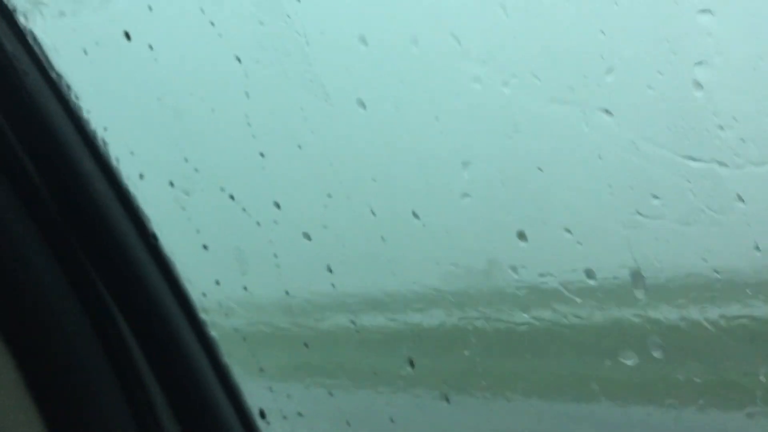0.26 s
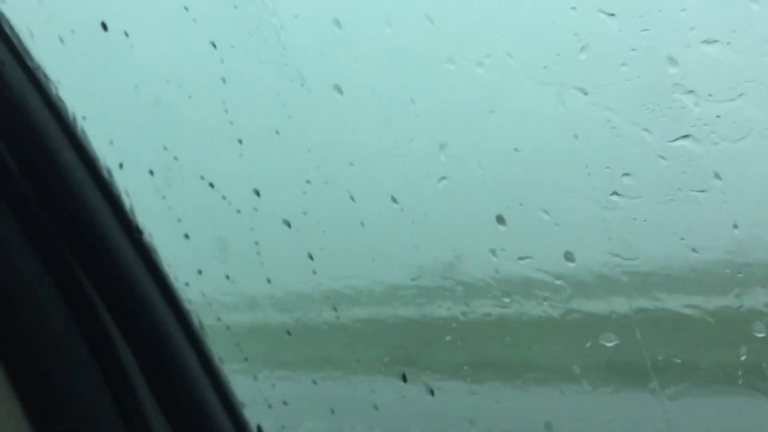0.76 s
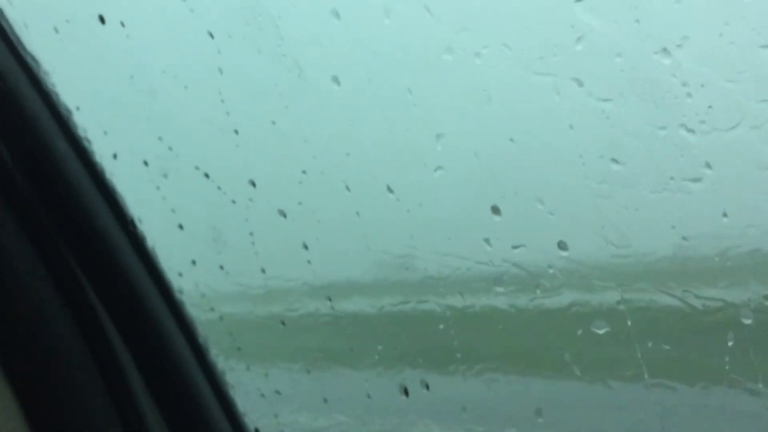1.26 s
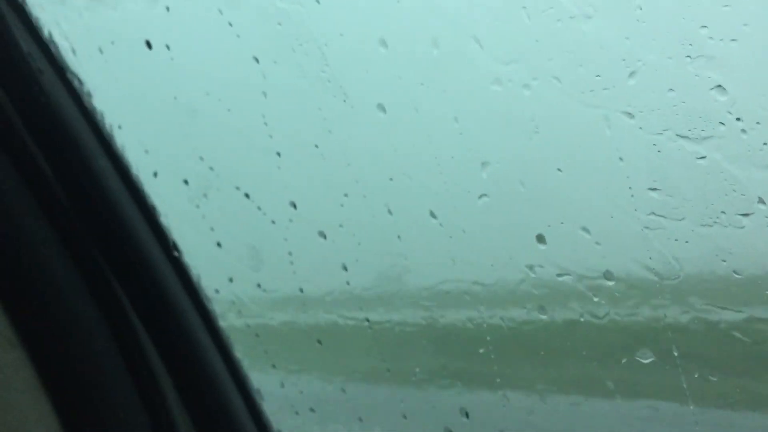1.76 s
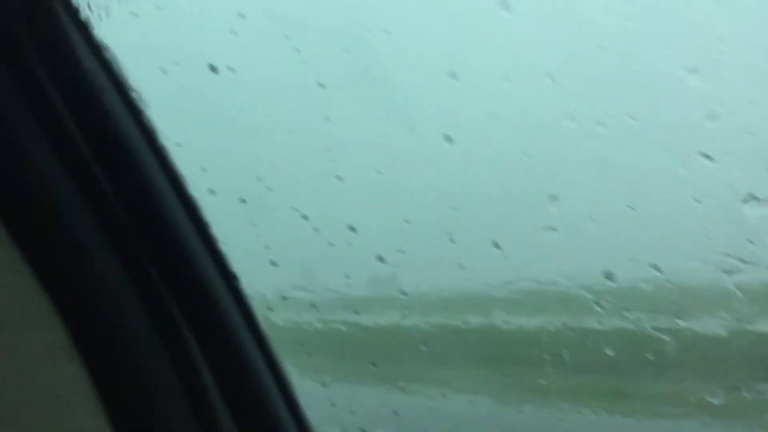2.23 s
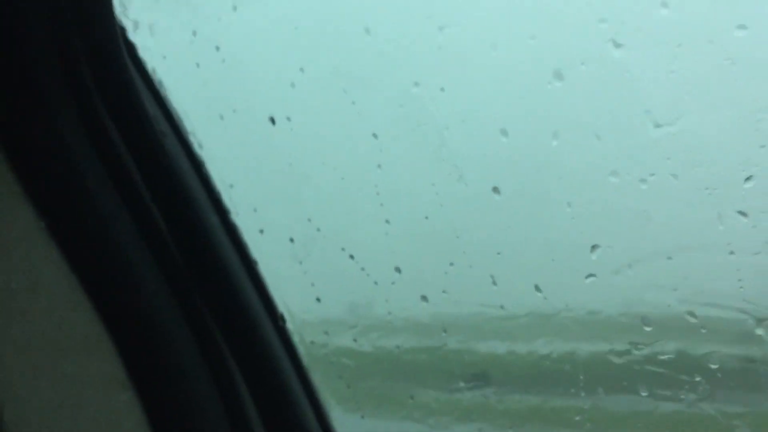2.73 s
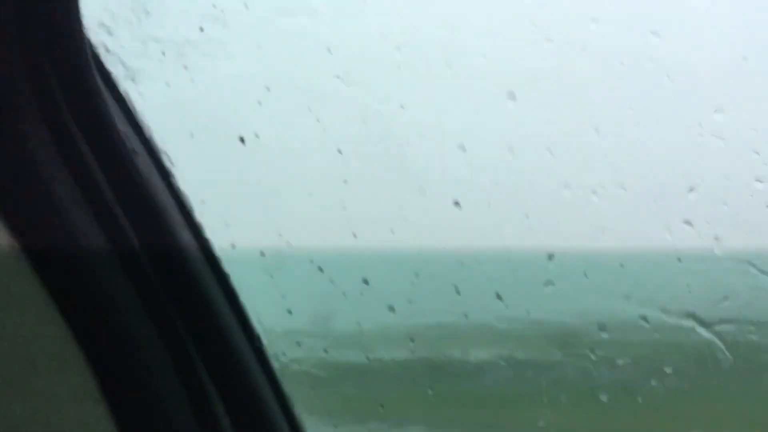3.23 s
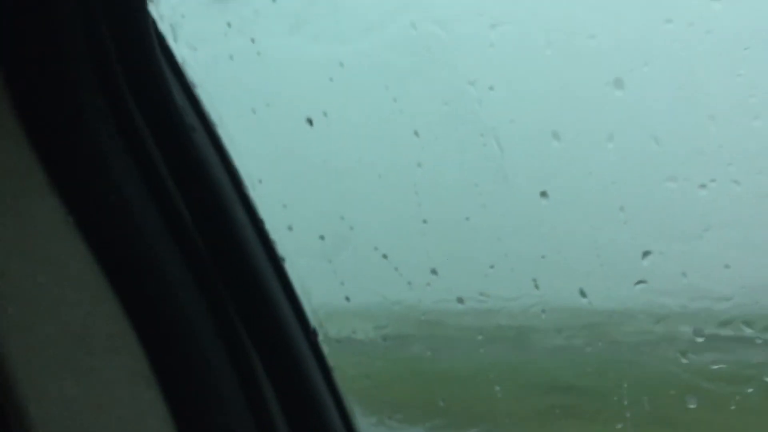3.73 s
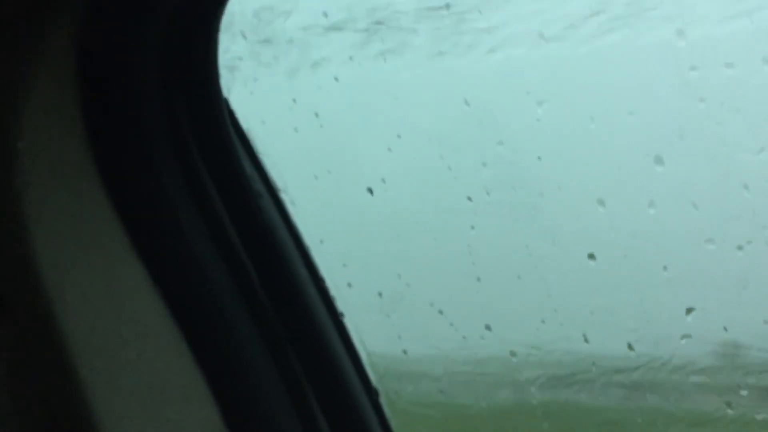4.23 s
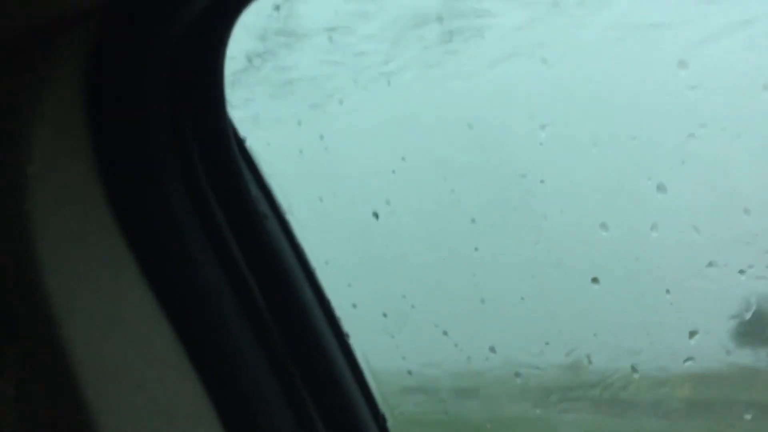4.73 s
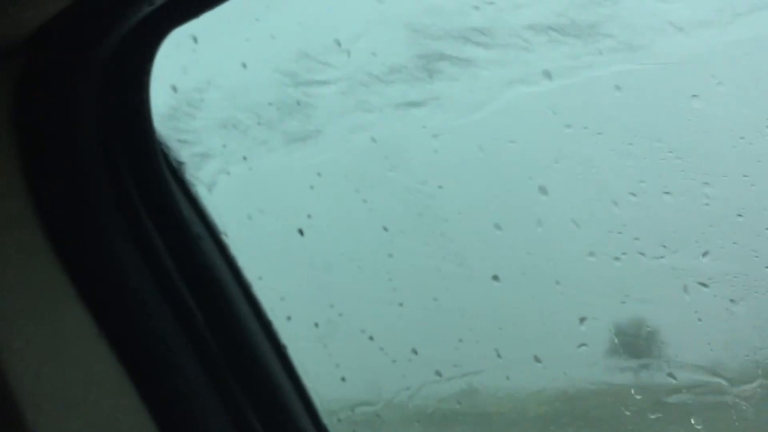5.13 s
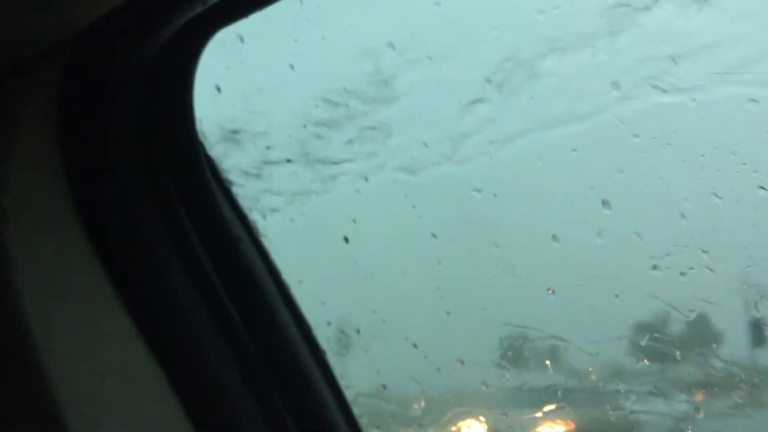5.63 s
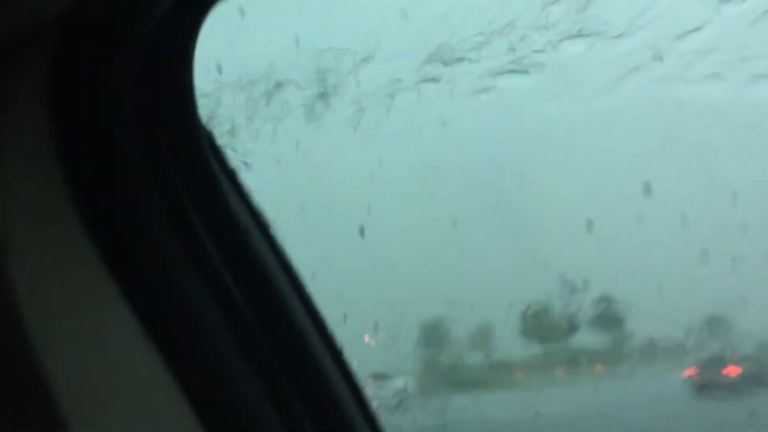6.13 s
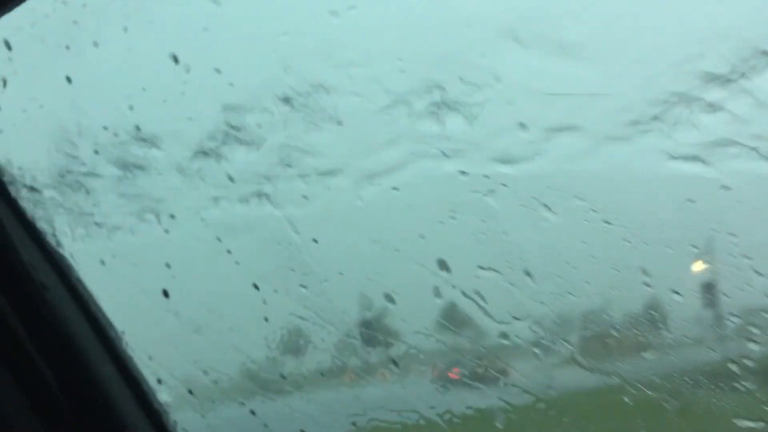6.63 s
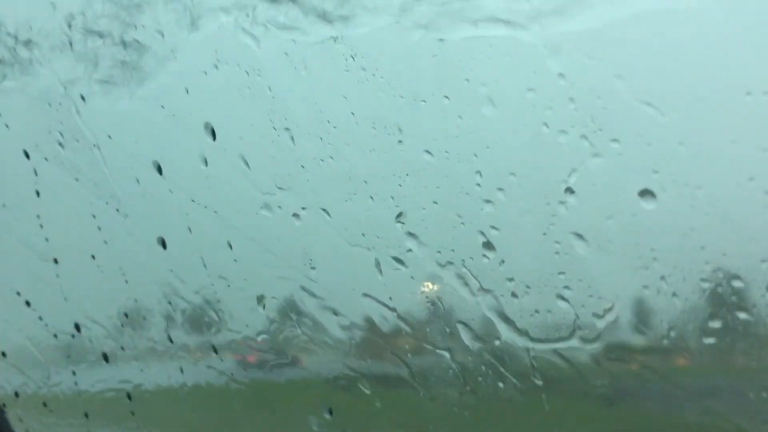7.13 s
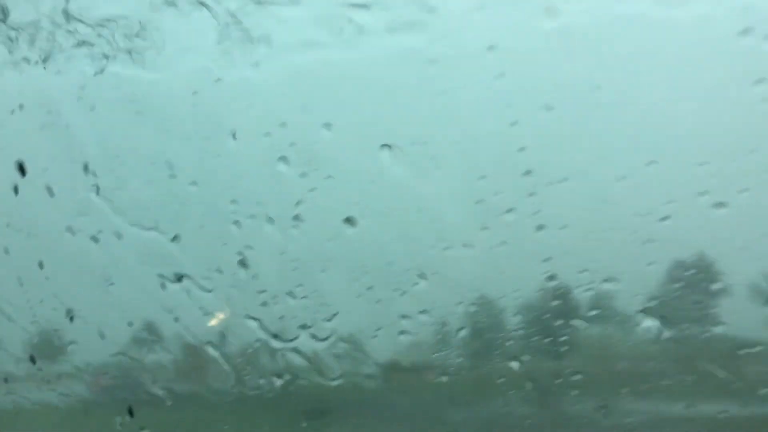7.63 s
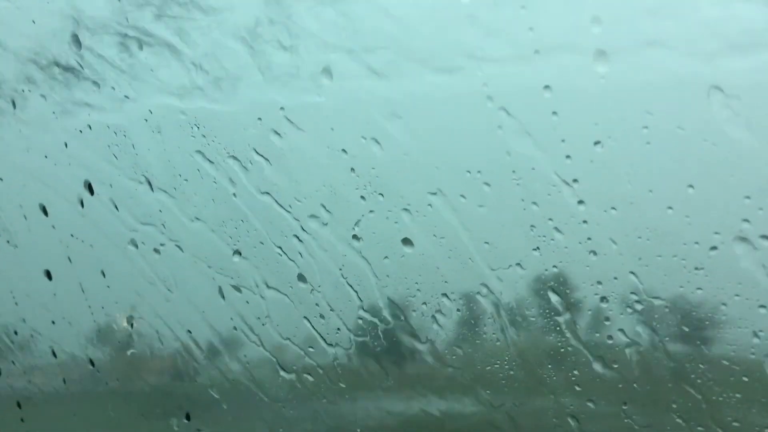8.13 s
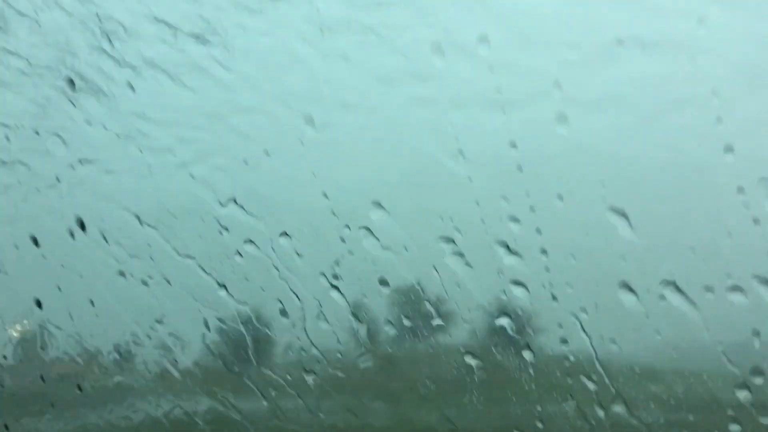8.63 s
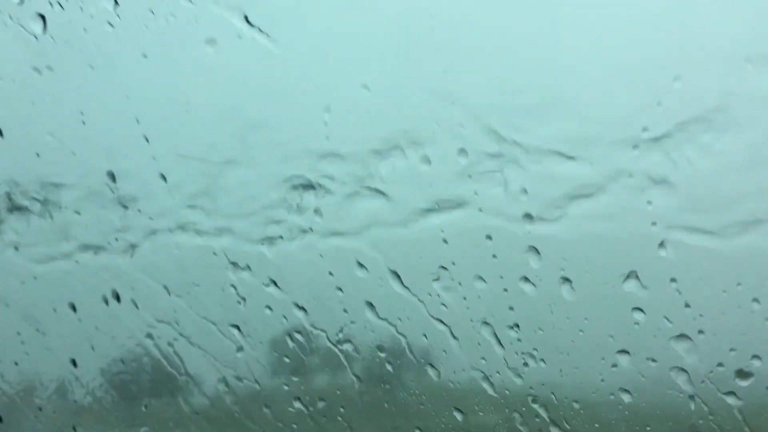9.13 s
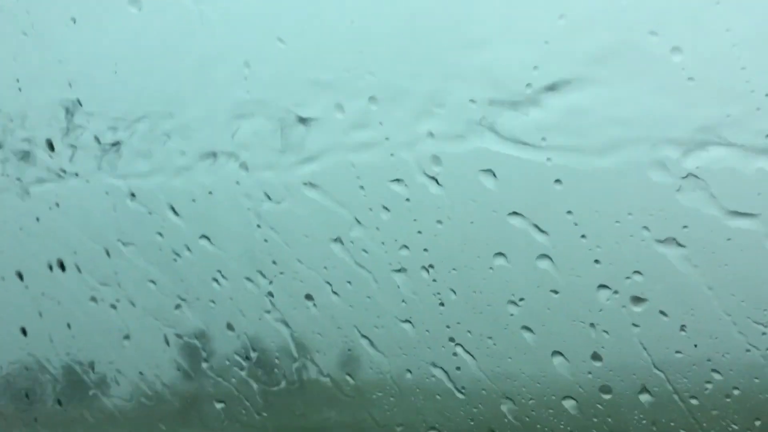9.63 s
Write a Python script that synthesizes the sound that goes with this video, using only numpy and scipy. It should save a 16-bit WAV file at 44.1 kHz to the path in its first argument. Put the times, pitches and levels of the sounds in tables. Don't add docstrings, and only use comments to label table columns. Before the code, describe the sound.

Heavy rain heard inside a small padded car cabin, microphone an arm's length from the glass. From 0 s a dense, uneven patter on the window mixes with hollow roof drumming, a thin spray hiss and a low rumble as wind shakes the shell. Near 2.4 s a sharp, loud drop smacks the pane with a metal knock, and more follow. Around 3 s a gusty sheet arrives with dull low thuds; the rain briefly slackens about 3.5 s. From 4 to 6 s it is hard again, with more thuds at 4 s and the brightest splats clustered around 5.5 to 5.9 s. A deep blow booms at 6.3 s. Flung water knocks sheet metal at about 7.1, 8.0 and most strongly 8.75 s, with muffled thumps beneath. Towards 9.8 s the downpour eases a little, still pattering with scattered drops and bumps.

```python
import sys
import numpy as np
from scipy import signal
from scipy.fft import rfft, irfft, next_fast_len
from scipy.io import wavfile
from scipy.ndimage import uniform_filter1d, map_coordinates

SR = 44100
rng = np.random.default_rng(int(sys.argv[2]) if len(sys.argv) > 2 else 0)


def boost_factor(decibels):
    exponent = np.asarray(decibels, float) / 20
    return 10 ** exponent


def master(y):
    cut = np.clip(np.atleast_2d(y).T, -1, 1)
    pcm = np.round(cut * 32767)
    wavfile.write(sys.argv[1], SR, pcm.astype(np.int16))


N = 435266


def unit(x):
    return x / np.sqrt(np.mean(x ** 2) + 1e-20)


def peak(x):
    return x / np.abs(x).max()


def along(points, hz):
    f, v = np.transpose(points)
    return np.interp(np.log(hz + 1), np.log(f + 1), v)


def wobble(rate):
    return map_coordinates(rng.standard_normal(4000), [np.arange(N) * rate / SR])


def swells(rows):
    t = np.arange(0, N + 64, 64) / SR
    db = sum(size * np.exp(-0.5 * ((t - s) / width) ** 2) for s, size, width in rows)
    return np.interp(np.arange(N) / SR, t, db)


def filtered(x, response):
    m = next_fast_len(len(x) + min(len(x), SR // 2))
    return irfft(rfft(x, m) * response(np.fft.rfftfreq(m, 1 / SR)), m)[:len(x)]


def coloured(x, colour):
    return unit(filtered(x, lambda hz: boost_factor(along(colour, hz))))


def modes(table):
    def response(f):
        total = 0
        for k, (centre, width, db) in enumerate(table):
            resonance = 1j * f * width / (centre * centre - f * f + 1j * f * width)
            total = total + (-1) ** k * boost_factor(db) * resonance
        return total
    return response


def place(out, s, sound):
    out[round(s * SR):][:len(sound)] += sound


def cabin(x, wet_db):
    # frequency in Hz, time to fall 60 dB in seconds.
    decay = [(300, 0.097), (2000, 0.073), (10000, 0.044)]
    out, step = np.zeros(N + SR), SR // 8
    edge = np.sin(np.pi / 2 * np.arange(512) / 512)
    fade = np.concatenate([edge, np.ones(step - 512), edge[::-1]])
    for start in range(0, N, step):
        hz, t, z = signal.stft(rng.standard_normal(SR // 8), SR, nperseg=128)
        fall = boost_factor(-60 * t / along(decay, hz)[:, None])
        tail = signal.istft(z * fall, SR, nperseg=128)[1]
        stretch = x[start:][:len(fade)] * fade[:N - start]
        wet = signal.fftconvolve(stretch, tail / np.linalg.norm(tail))
        out[start:start + len(wet)] += wet
    return x + boost_factor(wet_db) * out[:N]


def drops(count, spread_db, clump_db):
    when, size, sign = rng.random((count, 3)).T
    size_db = np.minimum(-spread_db * np.log(1 - size), 14)
    hits = np.bincount((when * N).astype(int), np.sign(sign - 0.5) * boost_factor(size_db), N)
    return unit(hits * boost_factor(clump_db * wobble(35)))


def burst(length, resonances, crack_db, tones_hz, rough):
    # frequency in Hz, level in dB per Hz.
    snap = [(600, -40), (1500, -9), (3500, -8), (5500, 1.5), (7500, -10.5), (10500, -23), (15200, -35),
            (15600, -90)]
    t = np.arange(SR // 10) / SR
    shape = (1 - np.exp(-t / 0.0017)) * np.exp(-t / length)
    ring, crack = rng.standard_normal((2, len(t))) * shape
    ring = filtered(ring, lambda f: modes(resonances)(f) / (1 + (f / 4500) ** 8))
    clear = shape * sum(np.sin(2 * np.pi * hz * t) for hz in tones_hz)
    crack = filtered(crack * np.exp(-t / 0.012), lambda f: boost_factor(along(snap, f)))
    splash = rough * peak(ring) + (1 - rough) * peak(clear)
    return peak(splash) + boost_factor(crack_db) * peak(crack)


def rain():
    # time in seconds, glass patter in dB.
    pour = [
        (0.0, -33.5),
        (1.64, -32),
        (3.29, -37),
        (4.93, -32.5),
        (6.58, -33),
        (8.22, -34.5),
        (9.87, -38),
    ]
    # time in seconds, change in dB, width in
    # seconds.
    sheets = [(0.12, 3, 0.027), (0.78, 2.5, 0.058), (1.44, 1.5, 0.08), (2.06, 3, 0.046), (2.58, 3, 0.021),
              (3.0, 5.5, 0.15), (3.16, 1, 0.072), (3.78, 7, 0.044), (3.98, 4, 0.023), (4.38, 4, 0.034),
              (5.04, 7.5, 0.021), (5.18, 2, 0.022), (5.56, 4, 0.07), (5.98, 3, 0.075), (6.24, 5, 0.025),
              (6.42, 3.5, 0.03), (6.68, 5.5, 0.016), (7.54, 2.5, 0.023), (7.81, 2.5, 0.052),
              (8.44, 6, 0.012), (8.72, 3.5, 0.033), (9.04, 6, 0.099), (9.18, 3.5, 0.036), (9.51, 3.5, 0.05),
              (9.68, 0, 0.022), (9.76, 6, 0.063),
              (.36, 1, 0.027), (.53, 1.5, .02), (2.27, -0.5, .025), (3.39, 2, 0.033), (4.52, 3.5, 0.015),
             (4.68, 3.5, 0.028), (4.82, 4.5, 0.012), (5.32, 0.5, .02), (6.84, 1, 0.024), (7.28, 0, 0.03),
             (7.97, 2, 0.022), (8.26, 3, 0.02), (8.87, 2.5, 0.0096), (9.33, 2.5, 0.016), (2.0, 0.5, 0.092),
             (4.95, -1, 0.11), (6.1, 0, 0.065), (.6, 0.5, .2)]
    # time in seconds, fall in dB, width in seconds.
    lulls = [(2.16, -7, 0.044), (3.54, -4.5, 0.01), (4.12, -0.5, 0.039), (4.28, -3, 0.019),
             (4.42, -5, 0.11), (4.57, -2.5, 0.037), (4.96, -7.5, 0.014), (5.26, -5.5, 0.013),
             (5.8, -2.5, 0.02), (6.545, -9, 0.034), (6.96, -6, 0.08), (7.14, -4, 0.038), (7.9, -4, 0.029),
             (8.12, -3, 0.071), (8.36, -1, 0.034), (8.6, -2.5, 0.032)]
    # time in seconds, change in dB, width in seconds.
    slaps = [(2.14, 4, 0.03), (3.42, -1, 0.19), (4.74, 2, 0.03), (5.7, 5, 0.026), (6.4, 0, 0.066),
             (4.2, -1.5, .08), (7.84, 2.5, 0.065), (9.36, -0.5, 0.11), (9.48, -0.5, 0.022),
             (9.58, -1.5, .06), (.6, 1, 0.092), (1.9, 1, 0.094), (8.06, -1.5, 0.021), (8.78, 3, 0.027)]
    # time in seconds, change of spray in dB, width in seconds.
    mist = [(.7, 1.5, 0.66), (2.5, -3.5, .05), (3.94, 1.5, 0.027), (4.38, 2.5, 0.031), (4.62, -1.5, 0.045),
            (5.84, 2, 0.053), (6.6, -1.5, 0.28), (7.075, 10.5, .005), (5.9, 0.5, 0.045), (2.95, 2, .05),
            (5.53, 3.5, .015), (5.64, 7, .012), (8.75, 4.5, 0.0087), (7.645, 6, .012), (8.22, 1, 0.054),
            (8.52, -1.5, 0.17), (9.67, -3, 0.13)]
    # frequency in Hz, level in dB per Hz.
    glass_colour = [(1000, -25), (1700, -3.5), (2610, -5), (3210, 1), (4520, -11.5), (5880, -42.5),
                    (9940, -120)]
    # frequency in Hz, level in dB per Hz.
    roof_colour = [(190, -31), (330, 1), (474, -3.5), (551, 2), (762, -8), (1050, -3.5), (1280, -7),
                   (1570, -6.5), (1830, -29), (2000, -13), (2600, -16), (4400, -120)]
    # frequency in Hz, level in dB per Hz.
    spray_colour = [(3500, -47), (4900, 1), (5600, 1), (7000, -7), (8000, -15), (9500, -19.5),
                    (10500, -28.5), (12000, -29), (15200, -42.5)]

    times, patter_db = np.transpose(pour)
    pour_db = np.interp(np.arange(N) / SR, times, patter_db) + swells(sheets + lulls)
    pour_db = pour_db - 0.18 * wobble(14)
    swing_db = pour_db - pour_db.mean()
    near = unit(cabin(drops(count=35000, spread_db=3, clump_db=0.7), wet_db=-3))

    def layer(colour, far_db):
        return coloured(near + boost_factor(far_db) * rng.standard_normal(N), colour)

    roof_db = -0.5 + 0.64 * swing_db + swells(slaps) + 0.76 * wobble(14)
    spray_db = -21 + 0.91 * swing_db + swells(mist) + 0.55 * wobble(27)
    glass = boost_factor(-0.5 + swing_db) * layer(glass_colour, far_db=0.0)
    roof = boost_factor(roof_db) * layer(roof_colour, far_db=1.5)
    spray = boost_factor(spray_db) * layer(spray_colour, far_db=0.5)
    return boost_factor(pour_db.mean()) * (glass + roof + spray)


def smacks():
    # start in seconds, peak in dB, centre in Hz, sharp crack in dB relative.
    big_drops = [(1.76, -31, 3150, -14), (4.832, -21.5, 3100, -19), (2.361, -10, 3910, -26),
                 (2.562, -13.5, 2220, -34), (2.626, -19.5, 1490, -28.5), (3.058, -28.5, 3220, -25),
                 (3.65, -21.5, 1584, -28), (3.721, -21, 3310, -22.5), (3.966, -25, 3460, -15.5),
                 (4.019, -23, 2900, -19), (4.209, -15.5, 2700, -34), (4.365, -27.5, 3300, -16),
                 (4.645, -19, 1500, -30), (4.824, -21.5, 2390, -16), (4.998, -34, 3450, -30.5),
                 (5.013, -23, 3640, -27), (5.184, -14.5, 3230, -26), (5.302, -27, 3160, -30),
                 (5.525, -10, 3354, -17), (5.548, -14.5, 3050, -24), (5.634, -10.5, 3630, -15.5),
                 (5.704, -15.5, 3280, -24), (5.873, -15, 3080, -25), (5.957, -21, 2280, -17),
                 (6.667, -28, 2890, -25), (7.294, -21, 2750, -29), (7.55, -18.5, 3110, -26),
                 (7.628, -30, 1540, -18), (8.916, -20, 2054, -24.5), (9.399, -18.5, 3580, -32)]
    out = np.zeros(N + SR)
    for s, db, hz, crack_db in big_drops:
        pane = [(650, 400, -6), (1200, 600, -18.5), (hz, 750, 1.5), (2600, 4000, -5)]
        place(out, s, boost_factor(db - 1.5) * burst(0.0044, pane, crack_db + 3.5, [hz], rough=0.71))
    return out[:N]


def ticks():
    # start in seconds, peak in dB, centre in Hz.
    small_drops = [(0.0352, -30, 1765), (0.1886, -23, 3330), (1.261, -17, 2260), (1.4004, -23, 2900),
                   (2.219, -25, 3210), (3.3142, -21, 3180), (3.3885, -17.5, 2020), (3.4316, -22, 3260),
                   (3.468, -21.5, 3180), (3.5922, -20, 2980), (4.3215, -27, 1527), (4.5092, -22, 3136),
                   (4.5886, -17.5, 3160), (5.1315, -24.5, 3270), (5.1482, -26, 3170), (5.461, -18.5, 3110),
                   (5.5089, -15, 3365), (6.1802, -24, 2210), (6.581, -23.5, 2610), (6.6064, -29.5, 3280),
                   (6.986, -18, 1627), (7.1674, -23.5, 2706), (7.9389, -27.5, 2680), (8.113, -23.5, 3450),
                   (8.4125, -21.5, 1610), (8.468, -21.5, 3150), (8.5116, -18, 3170), (8.6932, -27.5, 3080),
                   (8.8723, -18, 3230), (9.6406, -27.5, 2340), (9.68, -19, 3110)]
    out = np.zeros(N + SR)
    for s, db, hz in small_drops:
        pane = [(hz, 500, 0), (3300, 3000, -9)]
        place(out, s, boost_factor(db - 6) * burst(0.0056, pane, -29, [hz], rough=0.71))
    return out[:N]


def knocks():
    # start in seconds, peak in dB, first ring in Hz, second ring in Hz, length in seconds.
    flung = [(2.362, -16.5, 910, 1500, 0.0037), (7.063, -17, 520, 656, 0.0017),
             (7.07, -14.5, 1120, 1610, 0.0056), (8.033, -18.5, 1496, 1883, 0.0035),
             (8.037, -19, 630, 1202, 0.011), (8.743, -15, 1118, 1587, 0.0062),
             (8.747, -13, 778, 1098, 0.0084), (8.753, -20, 420, 812, .01), (9.485, -24, 800, 1244, 0.0081),
             (8.045, -20.5, 582, 1286, 0.01), (8.059, -24, 450, 1180, .008),
             (8.757, -20.5, 1500, 2300, .006), (8.768, -21.5, 455, 1000, .012),
             (6.257, -21, 1470, 1020, .006)]
    out = np.zeros(N + SR)
    for s, db, first_hz, second_hz, length in flung:
        metal = [(480, 400, -10), (first_hz, 190, 0), (second_hz, 280, 0), (2800, 1600, -20)]
        place(out, s, boost_factor(db) * burst(length, metal, -27.5, [first_hz, second_hz], rough=0.54))
    return out[:N]


def splashes():
    return cabin(smacks() + ticks() + knocks(), wet_db=-10.0)


def sparks():
    # start in seconds, peak in dB.
    fine_drops = [(0.1171, -47), (0.2094, -48.5), (0.2932, -47.5), (0.4155, -50.5), (0.5975, -49),
                  (1.1209, -49), (1.1927, -49), (1.4731, -46.5), (1.6297, -47.5), (1.7536, -48.5),
                  (2.3501, -46), (2.362, -42.5), (2.5626, -56.5), (2.5626, -48), (2.6189, -51),
                  (3.1567, -45.5), (3.3128, -52.5), (3.699, -53), (3.7305, -46.5), (3.7474, -47),
                  (3.9419, -48), (4.0183, -48.5), (4.2075, -46.5), (4.3221, -48.5), (4.3647, -48.5),
                  (4.6503, -50.5), (4.8155, -45), (4.8299, -40.5), (4.9886, -51.5), (5.1801, -45),
                  (5.2588, -53), (5.2994, -48), (5.5082, -36.5), (5.525, -33.5), (5.6347, -34),
                  (5.7034, -45.5), (5.8717, -44), (6.2572, -45), (6.5794, -54), (6.603, -51.5),
                  (6.6809, -47.5), (6.985, -53.5), (7.0718, -41.5), (7.5582, -49), (7.6442, -46),
                  (7.9009, -51), (8.2442, -51.5), (8.5622, -55), (8.5769, -49), (8.7435, -47),
                  (8.852, -50.5), (8.9308, -47), (8.9825, -51), (9.1247, -49), (9.3808, -55),
                  (9.398, -49.5), (9.5214, -52), (9.5953, -53.5)]
    # frequency in Hz, level in dB per Hz.
    colour = [(3000, -40), (5000, -2.5), (6500, -0.5), (8000, -10.5), (10000, -20), (12000, -28),
              (15200, -37), (15600, -90)]
    strays = np.abs(drops(count=500, spread_db=4, clump_db=2)) / np.sqrt(N / 500)
    hits = boost_factor(-61) * strays
    for s, db in fine_drops:
        hits[round(s * SR)] += boost_factor(db - 5)
    t = np.arange(SR // 40) / SR
    puff = (1 - np.exp(-t / 0.0006)) * np.exp(-t / 0.0047)
    fizz = coloured(rng.standard_normal(N), colour)
    return signal.fftconvolve(hits, puff)[:N] * fizz


def thuds():
    # start in seconds, peak in dB, pitch in Hz, length in seconds.
    blows = [(2.92, -17, 128, 0.036), (3.008, -10, 131, 0.025), (4.038, -9, 116.5, 0.039),
             (4.169, -9, 125, 0.045), (5.902, -16.5, 81.7, 0.056), (6.3, -7.5, 80.4, 0.06),
             (6.407, -14, 125, 0.042), (7.688, -13, 154, 0.031), (8.042, -11.5, 154.6, 0.032),
             (8.764, -9.5, 170, 0.037), (8.782, -18, 174, 0.022), (9.688, -15.5, 150, 0.016)]
    # start in seconds, peak in dB, pitch in Hz.
    bumps = [(0.049, -25, 265), (0.499, -26, 258), (0.789, -22, 273), (1.282, -26, 297), (1.575, -21, 313),
             (1.652, -20, 297), (2.26, -23, 247), (2.361, -19, 220), (2.861, -19.5, 286), (3.715, -23, 236),
             (4.811, -16.5, 520), (5.529, -15, 241), (5.635, -21, 317), (5.718, -17.5, 280),
             (5.91, -21, 267), (6.109, -22.5, 550), (7.559, -22, 338), (7.669, -20, 273), (8.04, -21, 242),
             (8.403, -23, 270), (8.745, -18, 250), (8.808, -17, 260), (9.134, -21, 294),
             (9.419, -20.5, 231), (9.46, -19.5, 296), (9.749, -22, 239), (9.836, -19.5, 349)]
    bump_s = 0.016
    out, t = np.zeros(N + SR), np.arange(SR // 5) / SR
    for s, db, hz, length in blows + [(*bump, bump_s) for bump in bumps]:
        phase = 2 * np.pi * hz * t
        swell = np.sin(np.pi * np.clip(t / length, 0, 1)) ** 0.85
        cycles = np.sin(phase) - 0.18 * np.cos(2 * phase) - 0.055 * np.sin(3 * phase)
        place(out, s, boost_factor(db - 5.5) * swell * cycles)
    return out[:N]


def shaken(force, table):
    def steep(f):
        return modes(table)(f) / (1 + (f / 330) ** 4) / (1 + (36 / (f + 1)) ** 4)
    return unit(filtered(force, steep))


def steadied(x, share):
    power = np.abs(uniform_filter1d(x ** 2, round(0.098 * SR)))
    return unit(x / (power + 0.02) ** (share / 2))


def body():
    # frequency in Hz, width in Hz, level in dB.
    sway_modes = [(44.5, 11, -4), (61.4, 17.3, -4), (81.4, 17.7, 1), (97.2, 17, -5)]
    # frequency in Hz, width in Hz, level in dB.
    boom_modes = [(125, 23, -2.5), (150.9, 14.3, 1.5), (174.1, 12.8, 0)]
    # frequency in Hz, width in Hz, level in dB.
    skin_modes = [(223.7, 31, -1), (292.2, 28.3, -1), (366, 58, -13.5)]
    # time in seconds, change in dB, width in seconds.
    lurches = [(0.24, -5, 0.046), (0.52, -8, 0.044), (0.82, -8, 0.042), (2.16, 2.5, 0.052),
               (2.56, -3.5, 0.1), (2.9, -6, 0.036), (3.12, 1.5, 0.04), (3.36, -3, 0.21), (4.0, 5.5, 0.18),
               (4.26, 0, 0.05), (4.54, -8, 0.037), (4.86, 6.5, 0.28), (5.92, 5, 0.084), (6.34, 9, 0.064),
               (7.1, 0.5, 0.046), (7.52, 5, 0.043), (8.4, -5.0, 0.056), (8.86, -2.5, 0.15),
               (9.25, 5, 0.061), (9.62, -8, 0.045)]
    # time in seconds, change in dB, width in seconds.
    buffets = [(1.44, 2.5, 0.056), (2.2, -7.5, 0.044), (3.0, 3.5, 0.045), (3.5, 0.5, .08), (4.2, 6, 0.058),
               (5.04, 5.5, 0.046), (5.64, 4, 0.14), (1.95, -2, 0.071), (6.33, 3, 0.093), (6.65, 1.5, 0.21),
               (8.35, 1.5, 0.1), (1.05, -6, .08), (7.14, -4, 0.025), (7.4, -4, 0.023), (7.92, -2, .03),
               (9.48, 2, 0.21)]
    # time in seconds, change in dB, width in seconds.
    drumming = [(.05, 1.5, .03), (.13, 1, .03), (.6, 1.5, 0.31), (1.6, 0, .2), (2.21, -9, .03),
                (2.48, -4, 0.035), (2.69, -2.5, 0.036), (2.95, 1.5, 0.14), (3.13, -3, .02),
                (3.6, -3.5, 0.099), (4.5, -1.5, 0.13), (4.8, 2.5, 0.046), (5.33, -3, .1), (5.68, -1.5, .07),
                (5.83, -9, .03), (5.91, 2.5, 0.027), (6.05, -6.5, 0.039), (6.37, -5.5, .1), (7.0, -0.5, .2),
                (7.56, 3, 0.044), (7.95, -0.5, .06), (8.11, -2, 0.037), (8.5, 1, 0.1), (8.8, 5.5, 0.037),
                (9.3, 1, 0.12), (9.48, 3, 0.035), (9.79, 4.5, 0.067)]
    sway = steadied(shaken(rng.standard_normal(N), sway_modes), 0.34)
    boom = steadied(shaken(rng.standard_normal(N) * boost_factor(0.66 * wobble(25)), boom_modes), 1.3 * 0.34)
    skins = shaken(rng.standard_normal(N) * boost_factor(1.46 * wobble(30)), skin_modes)
    low = boost_factor(-31 + swells(lurches)) * sway + boost_factor(-30.5 + swells(buffets)) * boom
    return low + boost_factor(-34.5 + swells(drumming)) * skins


def scene():
    hiss = boost_factor(-94.0) * rng.standard_normal(N)
    return (rain() + splashes() + sparks() + thuds() + body() + hiss)[None]


def low_pass(x):
    return signal.sosfilt(signal.butter(12, 15230, fs=SR, output="sos"), x)


def record(dry):
    close = np.minimum((N - np.arange(N)) / (0.004 * SR), 1)
    return low_pass(dry * close)


dry = scene()
out = record(dry)
master(out)
```